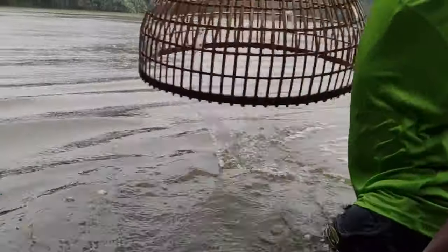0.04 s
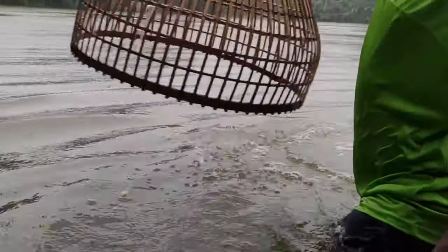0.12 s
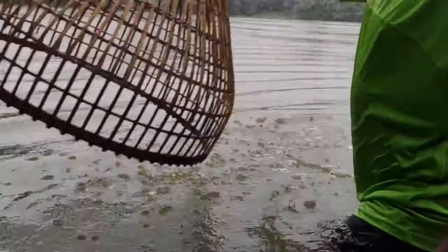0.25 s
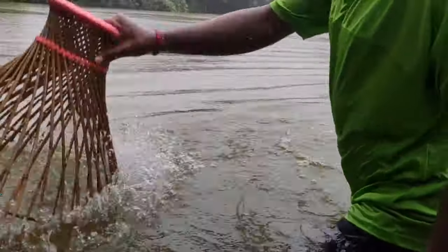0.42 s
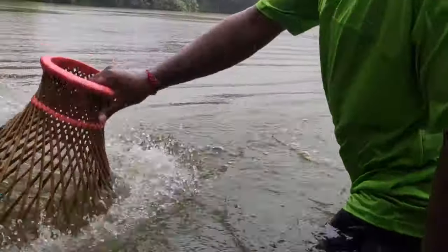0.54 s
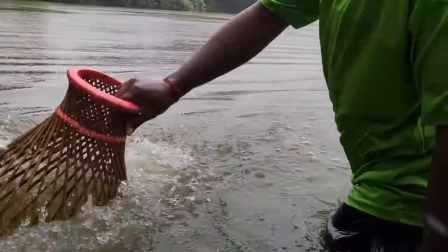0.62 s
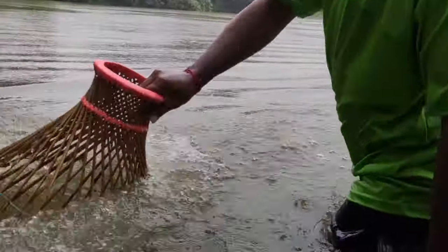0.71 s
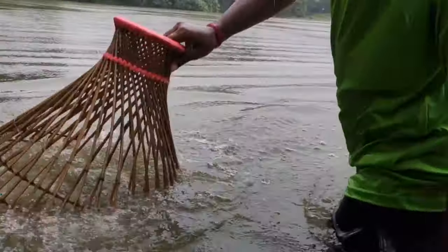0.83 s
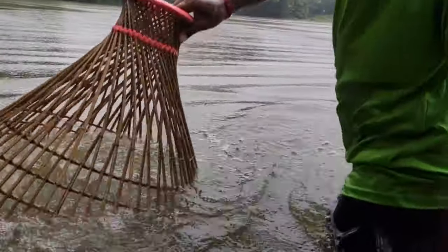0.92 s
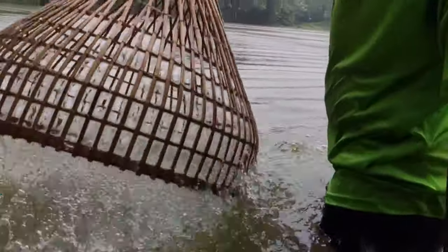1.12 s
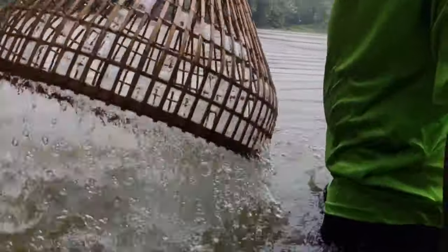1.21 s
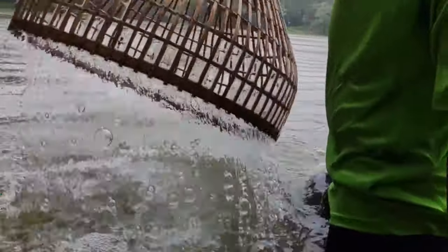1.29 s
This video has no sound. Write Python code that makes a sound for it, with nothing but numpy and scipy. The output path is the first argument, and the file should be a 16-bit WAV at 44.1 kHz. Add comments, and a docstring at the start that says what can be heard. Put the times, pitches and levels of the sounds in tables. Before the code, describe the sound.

Water splashes and bubbles as a cane basket is plunged in and lifted out dripping.

```python
"""Basket trap plunged into a pond

A woven trap is plunged in and lifted out, close to a small stereo microphone. The rim slaps the
surface, ringing trapped air and cane. The basket churns air under, which gurgles as bubbles.
Thrown water falls back as spray; drops and bubbles patter on while the trap drains.
Faint rumble, breeze and hiss lie underneath."""
import sys
import numpy as np
from scipy import signal
from scipy.io import wavfile
from scipy.ndimage import uniform_filter1d

SR = 44100
rng = np.random.default_rng(int(sys.argv[2]) if len(sys.argv) > 2 else 0)


def store_pcm(level_fs):
    """Save levels as 16-bit WAV."""
    pcm = np.round(np.clip(level_fs, -1, 1) * 32767).astype(np.int16)
    wavfile.write(sys.argv[1], SR, np.atleast_2d(pcm).T)


N = 59535
LAG_S, LAG_SPREAD_S = 0.00039, 0.00011  # the left port hears the splash later
BUBBLE_PAN_DB = 1.5


def slaps():
    """The rim hits the water: a pressure spike, then trapped air and cane ring."""
    # t/s, relative level/dB, air pocket f/Hz, t60/s
    hits = [(0.2343, -15.5, 530, 0.021), (.3335, -4, 777, 0.044), (0.337, -9, 553, 0.006),
            (.566, -27, 580, 0.02), (0.8432, -17, 580, 0.0082), (1.0655, -16, 577, 0.038)]
    crack_s, cane_hz, cane_t60_s = 0.00027, 4150, 0.02
    out = np.zeros((2, N))
    for s, db, hz, t60_s in hits:
        air = bubble(hz, t60_s)
        t = np.arange(len(air)) / SR
        crack = (1 - t / crack_s) * np.exp(-t / crack_s)
        cane = np.sin(2 * np.pi * cane_hz * t) * decay(t, cane_t60_s)
        add(out, s, amp(db) * (amp(2.5) * crack + amp(-9.5) * air + amp(-11.5) * cane))
    return out


def churn():
    """Air dragged under by the basket gurgles amid low slaps."""
    # f/Hz, gain/dB
    spectrum = [(60, -29), (130, -2.5), (230, -10.5), (400, -9.5), (560, -5), (740, 3), (880, 2),
                (1030, -7), (1270, 3), (1650, -14.5), (3000, -27), (8000, -58)]
    water = bubbles(201.8, 1820, per_s=2200, sizes=22)
    water += amp(-2) * unit_rms(impacts(per_s=1200, spread_db=3))
    return amp(1) * pan(BUBBLE_PAN_DB) * follow(colour(water, spectrum), "churn")


def plops():
    """Large bubbles that ring out singly."""
    # t/s, relative level/dB, f/Hz, t60/s
    large_bubbles = [(.072, -36, 1020, 0.025), (.184, -26, 1400, 0.02), (.206, -32.5, 1260, 0.039),
                     (.322, -17, 1202, 0.1), (.354, -14.5, 630, 0.063), (.363, -17, 228, 0.02),
                     (.366, -9, 633, 0.022), (.418, -18.5, 673, .05), (.561, -28, 218, 0.035),
                     (.564, -15, 755, 0.021), (1.242, -23, 1514, 0.034), (1.302, -34, 1840, 0.033),
                     (1.314, -30, 1380, 0.05)]
    out = np.zeros((2, N))
    for s, db, hz, t60_s in large_bubbles:
        ring = amp(db) * bubble(hz, t60_s)
        add(out[:1], s + LAG_S / 2, ring)
        add(out[1:], s, ring)
    return out * pan(BUBBLE_PAN_DB)


def patter():
    """Drops tick on the pond and leave small bubbles."""
    # f/Hz, gain/dB
    spectrum = [(300, -27), (1000, -12.5), (1500, 0), (2200, 1.5), (3100, -2.5), (4400, -1.5), (6500, -4),
                (9000, -23.5), (15000, -32)]
    ticks = unit_rms(impacts(per_s=3600, spread_db=2))
    rings = amp(-9.5) * bubbles(1431, 7250, per_s=760, sizes=18)
    return amp(-2) * pan(1.34) * follow(colour(ticks + rings, spectrum), "patter")


def spray():
    """Fine droplets fizz in a mist of tiny bubbles; sheets of them land in short bursts."""
    # f/Hz, gain/dB
    spectrum = [(1000, -39.5), (4000, -9.5), (6500, -4), (8000, -2.5), (10000, -0.5), (11500, -3.5),
                (13000, -6.5), (15000, -11)]
    # t/s, relative level/dB, time constant/s
    sheets = [(.238, -11, 0.0026), (0.2406, -12.5, 0.0058), (0.5642, -33, 0.0023), (0.6153, -12, 0.0012),
              (0.6226, -13, 0.0019), (0.8452, -17, .002), (1.0654, -14.5, 0.0017)]
    # where the spray lands: t/s, pan offset/dB
    landing_side = [(0.0, 1), (0.258, -4), (0.274, -0.5), (0.518, -6.5), (0.552, -10.5), (0.774, -3.5),
                    (0.992, -4.5), (1.03, 1), (1.056, -5.5), (1.35, -2)]
    drops = unit_rms(impacts(per_s=5100, spread_db=2.5))
    mist = amp(-0.5) * rng.standard_normal((2, N))
    rings = amp(-8.5) * bubbles(5030, 13050, per_s=550, sizes=14)
    fizz = follow(colour(drops + mist + rings, spectrum), "spray")
    t = np.arange(0, 0.03, 1 / SR)
    for s, db, tau_s in sheets:
        add(fizz, s, amp(db) * np.exp(-t / tau_s) * noise(spectrum, samples=len(t)))
    pan_db = 5.5 + np.interp(np.arange(N) / SR, *np.transpose(landing_side))
    return amp(-6.5) * pan(pan_db) * fizz


def bubble(hz, t60_s):
    """An air pocket rings, rising in pitch as it nears the surface."""
    rise, attack_s = 0.22, 0.00073
    t = np.arange(0, t60_s, 1 / SR)
    cycles = np.cumsum(hz * (1 + rise * t / t60_s)) / SR
    return np.sin(2 * np.pi * cycles) * decay(t, t60_s) * (1 - np.exp(-t / attack_s))


def bubbles(low_hz, high_hz, per_s, sizes):
    """A cloud of bubbles; the small ones die sooner."""
    t60_cycles = 36.6
    out = np.zeros((2, N))
    for hz in np.geomspace(low_hz, high_hz, sizes):
        ring = bubble(hz * rng.uniform(0.96, 1.04), t60_cycles / hz)
        onsets = impacts(per_s / sizes, spread_db=3)
        out += hz * signal.oaconvolve(onsets, ring[None], axes=1)[:, :N]
    return unit_rms(out)


def impacts(per_s, spread_db):
    """Random impulses, a few of them large, each from its own direction."""
    pan_spread = 0.35
    chance, size, sign = rng.random(N), rng.exponential(1, N), rng.choice([-1, 1], N)
    side, late = rng.standard_normal((2, N))
    at = np.flatnonzero(chance < per_s / SR)
    height = sign[at] * amp(spread_db * np.minimum(size[at], 4.5))
    lag = np.round((LAG_S + LAG_SPREAD_S * late[at]) * SR).astype(int)
    out = np.zeros((2, N))
    np.add.at(out[0], (at + lag) % N, height * np.exp(pan_spread * side[at]))
    out[1, at] = height * np.exp(-pan_spread * side[at])
    return out


def follow(x, layer):
    """Levels a texture, then swells it as the water is stirred."""
    # t/s, relative level/dB of churn, patter, spray
    stirring = [(0, -54, -46.5, -39), (0.07, -57.5, -42.5, -35), (0.15, -62, -46.5, -38.5),
                (0.185, -51, -46, -31), (0.227, -50.5, -38, -37.5), (0.246, -37, -26.5, -18),
                (0.259, -68, -33.5, -26), (0.278, -43, -38.5, -16.5), (0.304, -41, -25.5, -18.5),
                (0.324, -26.5, -26, -15.5), (0.333, -21.5, -23, -14), (0.365, -23.5, -18.5, -14),
                (0.405, -25, -19.5, -17.5), (0.427, -24.5, -19.5, -16), (0.456, -30.5, -23, -21.5),
                (0.49, -40, -30, -24.5), (0.538, -37.5, -30.5, -26), (0.565, -33.5, -24.5, -18),
                (0.595, -35.5, -33, -26), (0.626, -40, -30.5, -26.5), (0.66, -39.5, -33, -32.5),
                (0.72, -39, -39.5, -31.5), (0.81, -48.5, -41, -36), (0.89, -41.5, -36, -34),
                (0.93, -47.5, -41, -38), (0.98, -44, -34.5, -29), (1.02, -47, -41, -33.5),
                (1.05, -37.5, -38, -32), (1.12, -45, -40, -37), (1.19, -44.5, -36.5, -31),
                (1.35, -45, -37, -31.5)]
    times_s, *levels_db = np.transpose(stirring)
    layer_db = levels_db[["churn", "patter", "spray"].index(layer)]
    power = uniform_filter1d(uniform_filter1d((x ** 2).mean(0), size=900), size=600)
    return x / np.sqrt(abs(power) + 1e-20) * amp(np.interp(np.arange(N) / SR, times_s, layer_db))


def reflections(x):
    """Adds a dull echo off the pond and a brief scatter off basket and wader."""
    echo_s, echo_cutoff_hz = 0.001482, 3370
    n = np.arange(N)
    dull = signal.lfilter(*signal.butter(1, echo_cutoff_hz, fs=SR), x)
    echo = np.array([np.interp(n - echo_s * SR, n, side) for side in dull])
    t = np.arange(4000) / SR
    taps = rng.standard_normal((2, len(t))) * decay(t, t60_s=0.092)
    taps *= rng.random(taps.shape) < 0.03
    taps /= np.linalg.norm(taps, axis=1, keepdims=True)
    scatter = signal.fftconvolve(x, taps, axes=1)[:, :N]
    return x + amp(-14) * echo + amp(-10) * scatter


def outdoors():
    """Low air alike at both ports, a breeze buffeting each alone, a faint hiss."""
    # spectra: f/Hz, gain/dB
    rumble = [(15, -4), (35, -10.5), (70, -1), (160, -3.5), (260, -12.5), (600, -18), (2000, -34)]
    buffet = [(15, -7), (35, -4.5), (60, -10), (100, -23), (300, -57)]
    hiss = [(200, -12), (500, -5), (1000, -2), (4000, 10), (9000, -5), (13000, -3), (15000, -4.5)]
    return (amp(-49.5) * noise(rumble, channels=1)
            + amp(-55) * pan(-3) * noise(buffet)
            + amp(-44) * noise(hiss))


def port(x, hz, width_hz, db):
    """A microphone port adds its own narrow resonance."""
    return x + amp(db) * signal.lfilter(*signal.iirpeak(hz, hz / width_hz, SR), x)


def amp(db):
    """Decibels to gain."""
    return 10 ** (np.asarray(db) / 20)


def decay(t, t60_s):
    """Falls 60 dB in t60_s."""
    return np.exp(-np.log(1000) * t / t60_s)


def unit_rms(x):
    """Scales to rms 1."""
    return x / np.sqrt(np.mean(x ** 2) + 1e-20)


def pan(db):
    """Stereo gains for a left-minus-right level."""
    return amp(np.array([[0.5], [-0.5]]) * db)


def add(mix, s, sound):
    """Mixes a sound in at s seconds."""
    part = mix[:, max(round(s * SR), 0):][:, :sound.shape[-1]]
    part += sound[..., :part.shape[1]]


def colour(x, spectrum):
    """Minimum-phase filter through (f/Hz, gain/dB) points."""
    hz, db = np.transpose(spectrum)
    bins_hz = abs(np.fft.fftfreq(4096, 1 / SR)) + 1
    log_gain = np.log(amp(np.interp(np.log(bins_hz), np.log(hz), db)))
    taps = np.fft.ifft(np.exp(np.conj(signal.hilbert(log_gain)))).real[:2048]
    return signal.fftconvolve(x, taps[None], axes=1)[:, :x.shape[1]]


def noise(spectrum, channels=2, samples=N):
    """Coloured noise at rms 1."""
    return unit_rms(colour(rng.standard_normal((channels, samples)), spectrum))


def scene():
    """All the water over the outdoor air."""
    return slaps() + reflections(churn() + patter() + spray()) + plops() + outdoors()


def record(dry):
    """Two ringing ports, then a steep low-pass."""
    cutoff_hz = 14950
    left = port(dry[0], hz=10200, width_hz=1500, db=-11.5)
    right = port(dry[1], hz=8967, width_hz=710, db=12.5)
    taps = signal.firwin(511, cutoff_hz, window=("kaiser", 9), fs=SR)
    return signal.oaconvolve(np.array([left, right]), taps[None], "same")


dry = scene()
out = record(dry)
store_pcm(out)
```